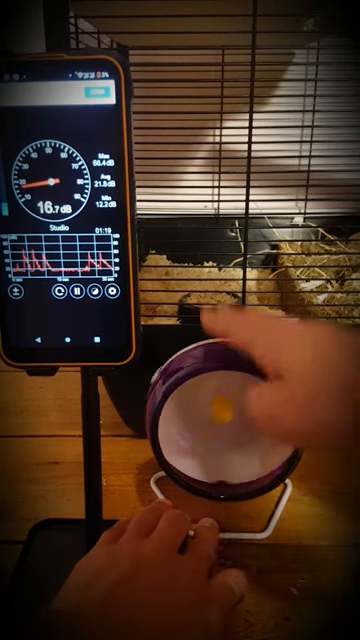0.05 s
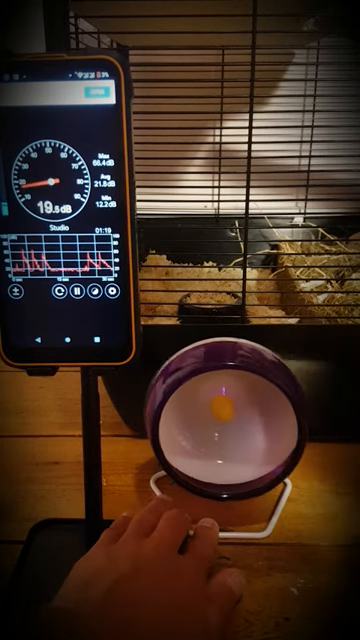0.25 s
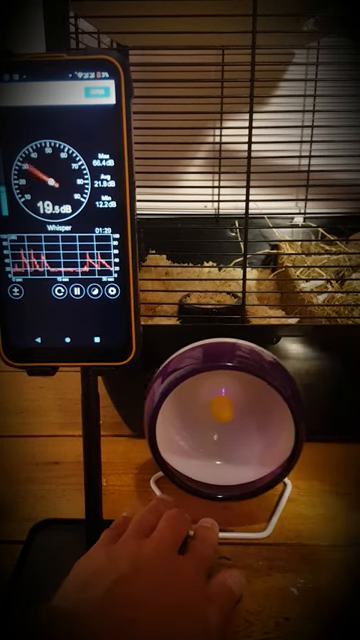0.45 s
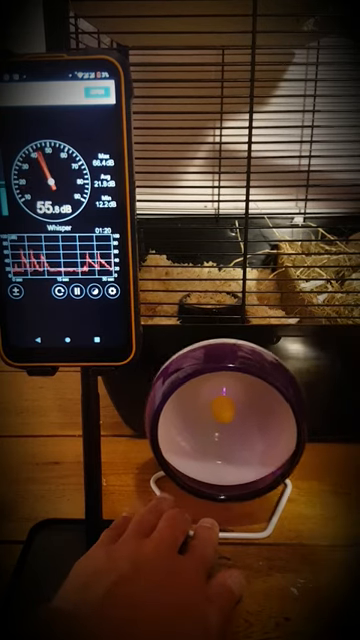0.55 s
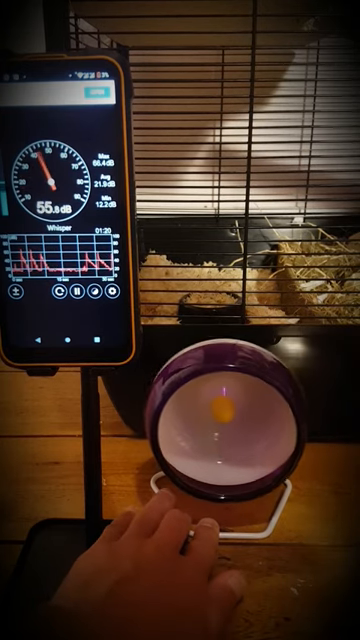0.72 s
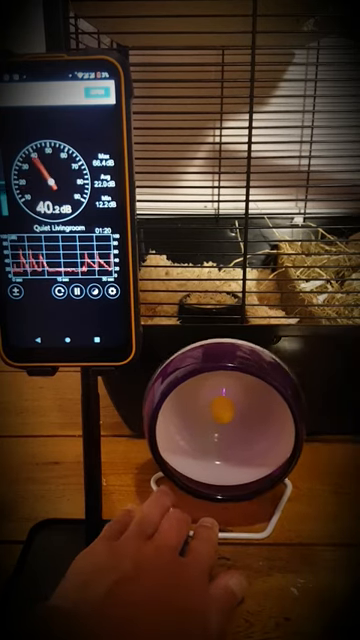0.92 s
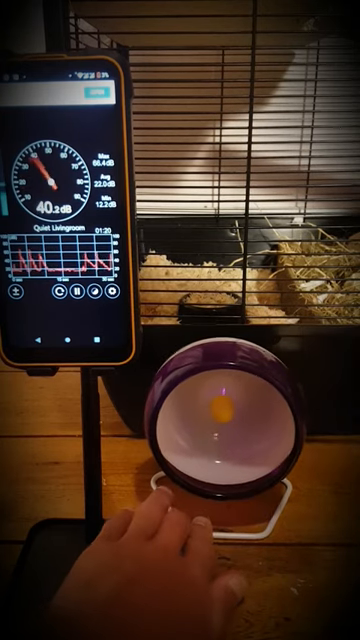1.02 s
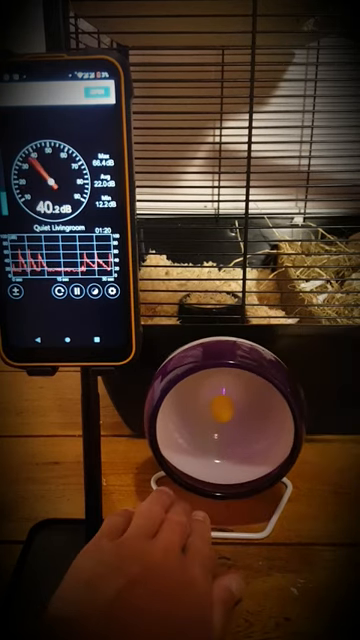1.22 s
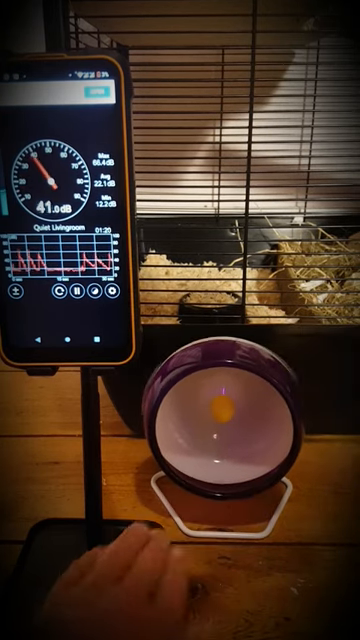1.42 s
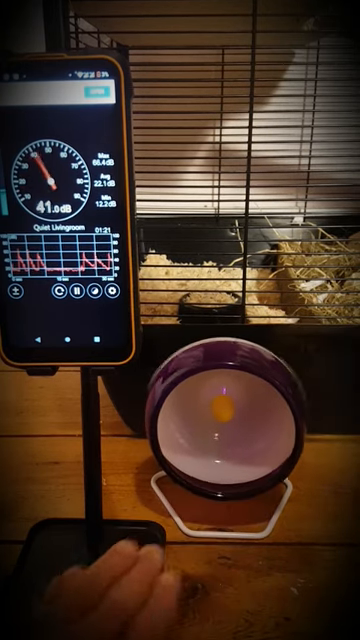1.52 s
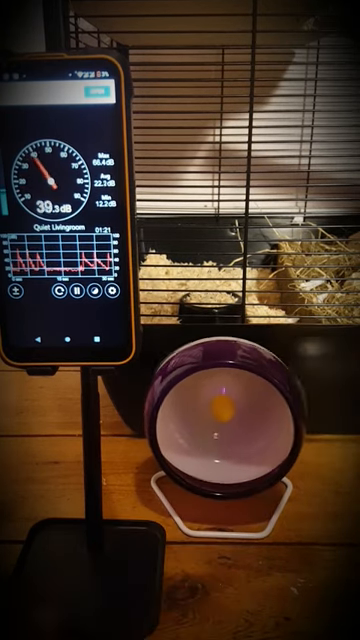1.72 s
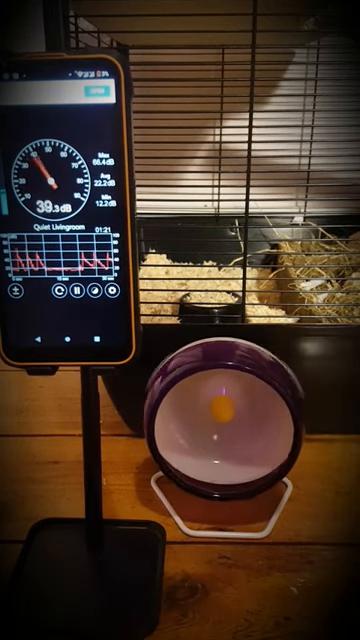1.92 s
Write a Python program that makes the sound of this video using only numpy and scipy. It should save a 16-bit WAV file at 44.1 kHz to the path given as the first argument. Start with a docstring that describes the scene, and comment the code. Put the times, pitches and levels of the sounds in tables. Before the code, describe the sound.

Plastic hamster wheel spinning with a low rattling whir after a finger flick and a knock.

```python
"""A fingertip scuffs and flicks a plastic hamster wheel on a wooden table, close up in a small, quiet room.
The stand shudders and the wheel knocks and chatters on its axle, then spins freely: the rolling bearing
drums on the hollow bowl with a low whir and a light rattle, dotted with clacks and off-centre bumps.
A soft hiss, like a sleeve brushing, comes in at the end."""
import sys
import numpy as np
from scipy import signal
from scipy.fft import rfft, irfft
from scipy.io import wavfile
from scipy.ndimage import uniform_filter1d

SR = 44100
rng = np.random.default_rng(int(sys.argv[2]) if len(sys.argv) > 2 else 0)


def output_pcm(signal):
    """Save a mono or channel-first signal as 16-bit PCM at the path in sys.argv[1].

    Samples are clipped to [-1, 1] before scaling.
    """
    pcm = np.clip(np.atleast_2d(signal).T, -1, 1) * 32767
    wavfile.write(sys.argv[1], SR, np.round(pcm).astype(np.int16))


N = 85995
T = np.arange(N) / SR
FREQ = np.arange(N + 1) * SR / (2 * N)
SIDES = np.array([[1], [-1]])  # left, right

# colour of the room tone (f/Hz, level/dB)
AIR_EQ = [(20, 4), (55, 4.5), (100, 2), (165, 6.5), (300, 2), (500, -10.5), (1200, -12.5), (3000, -18),
          (6000, -22.5), (10000, -26.5), (14500, -24.5)]

# finger touches on the rim (t/s, scuff level/dB, ring level/dB, attack/s)
RIM_TOUCHES = [(0.132, -66.5, -59, 0.0067), (0.172, -40.5, -42, 0.0028), (.190, -43.5, -35, 0.0023),
               (0.2104, -54.5, -32.5, 0.0058), (0.375, -49, -38, 0.0018)]
# colour of the scuff (f/Hz, level/dB)
SCUFF_EQ = [(300, -28), (900, -27), (1450, 10.5), (2050, 8), (2600, -4.5), (3600, 3), (4300, -2),
            (5000, -8), (6500, -15), (9000, -19), (14500, -18)]
# resonances of the rim under the finger (f/Hz, width/Hz, level/dB)
RIM_MODES = [(306, 116, -1.5), (596, 92, -9.5), (802, 41, -6), (960, 65, 0.5), (1220, 40, -5)]

# envelope of the stand's shudder (t/s, level/dB)
SHUDDER_ENVELOPE = [(.12, -75.5), (.17, -51), (.225, -56), (.255, -34), (.30, -37), (.335, -50),
                    (.49, -46.5), (.53, -55), (.565, -67), (.72, -63), (1.0, -72.5)]

# envelopes of the three spin layers (t/s, whir level/dB, rattle level/dB, grit level/dB)
SPIN_ENVELOPES = [(0.33, -38.5, -42, -54), (0.37, -49, -42, -56.5), (0.414, -39.5, -51.5, -59.5),
                  (0.572, -48.5, -44, -58.5), (0.614, -42.5, -47.5, -56.5), (0.772, -48.5, -47, -62.5),
                  (0.798, -47.5, -45, -55.5), (0.888, -42, -47, -60.5), (0.978, -54, -49, -66),
                  (1.02, -39.5, -49.5, -61), (1.154, -45.5, -50.5, -64), (1.276, -39.5, -50, -66.5),
                  (1.312, -43, -49, -63), (1.574, -43.5, -51, -67), (1.894, -45, -54.5, -64.5),
                  (1.95, -52, -56.5, -76)]
# low resonances of the bowl (f/Hz, width/Hz, level/dB)
WHIR_MODES = [(163.7, 52, -11.5), (203, 23, -10), (258.3, 37.5, 1.5), (285.6, 25, 0), (334.5, 24.8, 0),
              (369.7, 23.6, -1), (491.8, 40, -9), (550.6, 25, -11)]
# colour of the rumble passed to the table top (f/Hz, level/dB)
TABLE_EQ = [(30, -25), (55, -8), (80, -17), (110, -5), (160, -4.5), (210, -8), (260, -0.5), (420, -14.5),
            (700, -39), (2000, -80)]
# midrange resonances of the bowl (f/Hz, width/Hz, level/dB)
RATTLE_MODES = [(487, 88, -15), (634, 118, -9.5), (773, 60, -3), (892, 76, -2), (960, 68, -1),
                (1034, 86.4, -3.5), (1196, 136, -7.5), (1493, 44, -15.5)]
# colour of the bearing grit (f/Hz, level/dB)
GRIT_EQ = [(900, -25), (1700, 9.5), (2300, 1.5), (2700, 2.5), (4100, -3.5), (4900, -11), (7500, -18.5),
           (10000, -22), (14500, -23.5)]
# high resonances of the thin shell (f/Hz, width/Hz, level/dB)
SHELL_MODES = [(1700, 110, -2.5), (2018, 51, 10), (2280, 49, 1), (2670, 21, 2.5), (3170, 40, -4.5),
               (3866, 147, -6), (4290, 60, -10.5)]

# the knock and its rebounds (t/s, level/dB, contact time/ms)
AXLE_HITS = [(0.2417, 5.5, 0.46), (.2518, -17.5, 0.93), (0.264, -22, 0.89), (.2722, -9.5, .5),
             (0.2832, -10.5, 0.14), (.2950, -26, .8), (.3075, -10.5, 1)]
# modes of the knocked wheel and stand (f/Hz, level/dB, t60/s)
BODY_MODES = [(106, -19, 0.47), (129.1, -20, 0.52), (154.5, -26, 0.26), (200.4, -14.5, 0.182),
              (232, -20, 0.37), (297.7, -16, 0.18), (363.2, -9, 0.17), (407, -5.5, 0.133),
              (478.5, -11, 0.18), (576.3, -5, 0.13), (684.8, -1.5, 0.15), (807, -5, 0.052),
              (999, -5, 0.034), (1117, -5, 0.043), (1295, 1.5, 0.019), (1566, -7, 0.049),
              (2062, -13.5, 0.06), (2295, -25, 0.1)]

# clacks of play in the bearing (t/s, level/dB, tick offset/dB)
BEARING_CLACKS = [(0.344, -41, -32), (0.377, -34, -24), (0.401, -37.5, -46), (0.421, -31.5, -28),
                  (0.451, -32, -32), (0.488, -33.5, -24), (0.517, -33.5, -23), (0.62, -36, -21),
                  (0.704, -40, -30), (0.793, -38, -25), (1.0, -42, -13), (1.208, -37, -26),
                  (1.238, -39.5, -31), (1.265, -29, -30.5), (1.41, -39, -25)]
# bumps of the off-centre wheel on its axle (t/s, level/dB)
AXLE_BUMPS = [(0.455, -34), (0.524, -31), (0.586, -34.5), (0.617, -31), (0.781, -34.5), (0.835, -31.5),
              (0.997, -35.5), (1.091, -34), (1.143, -30.5), (1.189, -28.5), (1.213, -25.5), (1.271, -30),
              (1.486, -30), (1.506, -37), (1.631, -41), (1.706, -29.5), (1.819, -51), (1.868, -30)]

# colour of the sleeve's hiss (f/Hz, level/dB)
SLEEVE_EQ = [(800, -1), (2000, 5), (4000, 5), (6000, -0.5), (9000, 3.5), (13000, 2), (15000, -6)]

# balance of the direct sound (f/Hz, left minus right/dB)
DIRECT_PAN = [(100, 2.5), (200, -0.5), (370, -0.5), (680, 3), (1250, -4), (2300, -3), (4200, 0.5),
              (7000, 16), (14000, -5)]
# colour of the room's reflections (f/Hz, level/dB)
REVERB_EQ = [(80, -20), (180, -24), (350, -8.5), (700, -11), (1400, -5.5), (3000, -5), (8000, 0)]


def amp(db):
    """Decibels to gain."""
    return 10 ** (np.asarray(db) / 20)


def unit(x):
    """Scale to rms 1."""
    return x / np.sqrt(np.mean(x ** 2))


def pan(db):
    """Left and right gains that lie db apart; negative leans right."""
    return amp(SIDES * db / 2)


def by_hz(points):
    """Spread an EQ curve (f/Hz, level/dB) over the frequency axis."""
    hz, db = np.array(points).T
    return np.interp(np.log(FREQ + 1), np.log(hz), db)


def shape(x, response):
    """Filter by a frequency response."""
    return irfft(rfft(x, 2 * N) * response)[..., :N]


def colour(x, points):
    """Causal EQ through (f/Hz, level/dB) points; rms 1."""
    cepstrum = irfft(np.log(amp(by_hz(points))))
    return unit(shape(x, np.exp(rfft(2 * cepstrum[:N], 2 * N))))


def resonate(x, modes):
    """Parallel resonators of alternating polarity."""
    bands = ((-1) ** k * amp(db) * 1j * FREQ * width / (f * f - FREQ ** 2 + 1j * FREQ * width)
             for k, (f, width, db) in enumerate(modes))
    return shape(x, sum(bands))


def even(x, window=3500):
    """Leveller: keep the quick flutter, flatten swells longer than the window of samples."""
    return x / np.sqrt(uniform_filter1d(x * x, window) + 1e-18)


def envelope(rows, column=1):
    """Gain over time from one dB column of a timed table."""
    rows = np.array(rows)
    return amp(np.interp(T, rows[:, 0], rows[:, column]))


def swell(start, attack):
    """Rounded attack up to 1, then a decay."""
    age = np.maximum(T - start, 0) / attack
    return age * np.exp(1 - age)


def burst(start, decay):
    """Instant attack, exponential decay."""
    return (T >= start) * np.exp(-np.maximum(T - start, 0) / decay)


def room_tone(wide_above_hz=600):
    """A quiet bed of room noise, near mono in the bass."""
    mid, side = colour(rng.standard_normal((2, N)), AIR_EQ)
    return amp(-61) * (mid + SIDES * shape(side, FREQ / (FREQ + wide_above_hz)))


def finger(ring_lag_s=0.0019):
    """The fingertip catches the rim: a crisp scuff, and the rim rings hollow."""
    scuff = even(colour(rng.standard_normal(N), SCUFF_EQ), window=200)
    ring = even(resonate(rng.standard_normal(N), RIM_MODES), window=300)
    out = np.zeros(N)
    for t, scuff_db, ring_db, attack in RIM_TOUCHES:
        out += amp(scuff_db) * swell(t, attack) * scuff
        out += amp(ring_db) * swell(t, attack + ring_lag_s) * ring
    return out


def shudder(hum_hz=77):
    """The stand hums on the table top until the wheel settles."""
    return envelope(SHUDDER_ENVELOPE) * unit(np.sin(2 * np.pi * hum_hz * T))


def bearing_contacts(spread_db, per_s=520):
    """Dense tiny impacts of the rolling bearing, uneven in spacing and force."""
    count = int(per_s * N / SR)
    jitter, chance, polarity = rng.random((4000, 3))[:count].T
    onsets = ((np.arange(count) + jitter) / per_s * SR).astype(int) % N
    force = amp(-spread_db * np.log(np.maximum(chance, .02)))
    impacts = np.zeros(N)
    impacts[onsets] = np.sign(polarity - .5) * force
    return impacts


def roll_hz(start_hz=375.4, sag_hz_per_s=45):
    """The rolling frequency sinks as the wheel slows."""
    return start_hz - sag_hz_per_s * T


def whir(drive, lift_db=4, lift_width_hz=27):
    """The bowl's low modes ring, lifted near the rolling frequency, over a rumble from the table top."""
    bowl = np.zeros(N)
    for f, width, db in WHIR_MODES:
        band = [(f, width, 0)]
        ring = even(resonate(resonate(drive, band), band), window=9000)  # two passes for steep skirts
        nearness = np.exp(-((f - roll_hz()) / lift_width_hz) ** 2)
        bowl += ring * amp(db + lift_db * nearness)
    return even(bowl) + amp(-17.5) * even(colour(drive, TABLE_EQ))


def spin(start_s=0.16, fade_in_s=0.11):
    """Bearing contacts set the bowl whirring and rattling; fine grit rings the thin shell."""
    drive = bearing_contacts(spread_db=3.5)
    fine = drive + bearing_contacts(spread_db=4)
    shell = amp(-4) * unit(resonate(fine, SHELL_MODES))
    low = amp(-1) * envelope(SPIN_ENVELOPES, column=1) * whir(drive)
    rattle = amp(-2) * envelope(SPIN_ENVELOPES, column=2) * even(resonate(drive, RATTLE_MODES))
    grit = amp(-1) * envelope(SPIN_ENVELOPES, column=3) * even(colour(fine, GRIT_EQ) + shell)
    return (low + rattle + grit) * np.clip((T - start_s) / fade_in_s, 0, 1)


def knock(crack_decay_s=.012):
    """The released wheel strikes its axle and rebounds about a hundred times a second."""
    body = sum((-1) ** k * amp(db) * amp(-60 * T / t60) * np.sin(2 * np.pi * f * T)
               for k, (f, db, t60) in enumerate(BODY_MODES))
    # the longer the contact, the duller the hit
    hit_spectrum = sum(amp(db) * np.exp(-2j * np.pi * FREQ * t) / (1 + 1j * FREQ * ms / 1000) ** 2
                       for t, db, ms in AXLE_HITS)
    crack_level = sum(amp(db) * burst(t, crack_decay_s) for t, db, _ in AXLE_HITS)
    crack = crack_level * colour(rng.standard_normal(N), GRIT_EQ)
    return amp(-21.5) * shape(body, hit_spectrum) + amp(-47) * crack


def clacks(attack_s=0.0037, rub_hz=1040, rub_width_hz=570):
    """Slack in the bearing: short rubbing clacks, each topped with a faint gritty tick."""
    tick = amp(3) * even(colour(rng.standard_normal(N), GRIT_EQ), window=300)
    bowl = resonate(rng.standard_normal(N), RATTLE_MODES)
    rub = amp(-7.5) * even(resonate(bowl, [(rub_hz, rub_width_hz, 0)]), window=500)
    return sum(amp(db) * swell(t, attack_s) * (rub + amp(tick_db) * tick)
               for t, db, tick_db in BEARING_CLACKS)


def bumps(attack_s=0.0046):
    """The off-centre wheel bumps its axle: short throbs pitched at the rolling frequency."""
    throb = np.sin(2 * np.pi * (np.cumsum(roll_hz()) / SR + rng.random()))
    return amp(-6) * throb * sum(amp(db) * swell(t, attack_s) for t, db in AXLE_BUMPS)


def sleeve(start_s=1.74, fade_in_s=0.069, fade_db_per_s=18):
    """A sleeve brushes as the arm draws away: soft, bright hiss on the right."""
    age = T - start_s
    level = np.clip(age / fade_in_s, 0, 1) * amp(-60.5 - fade_db_per_s * age)
    return level * colour(rng.standard_normal((2, N)), SLEEVE_EQ) * pan(-5)


def room(x, t60_s=0.2, predelay_s=.002, mid_db=-5, phase_rad=1, phase_corner_hz=1240):
    """Pan the direct sound by frequency; cage and walls add a short tail, widest in the treble."""
    phase_gap = phase_rad * FREQ ** 2 / (FREQ ** 2 + phase_corner_hz ** 2)  # left lags right
    direct = pan(by_hz(DIRECT_PAN)) * np.exp(-.5j * SIDES * phase_gap)
    tail = rng.standard_normal((2, N)) * amp(-60 * T / t60_s) * (T > predelay_s)
    tail_gain = amp(by_hz(REVERB_EQ))
    mid, side = rfft(unit(tail) / np.sqrt(N), 2 * N) * tail_gain
    build_up = np.hypot(1, amp(mid_db) * tail_gain)
    return shape(x, (direct + amp(mid_db) * mid + SIDES * side) / build_up)


def scene():
    """Flick, knock and free spin in the room, with the spin a little to the right."""
    rolling = (spin() + clacks() + bumps()) * pan(-2)
    wheel = finger() + shudder() + knock() + rolling
    return room(wheel) + sleeve() + room_tone()


def record(dry, low_cut_hz=45, high_cut_hz=14700):
    """The microphone drops the deep bass and cuts the top."""
    low_cut = signal.butter(2, low_cut_hz, "high", fs=SR, output="sos")
    high_cut = signal.ellip(10, .2, 70, high_cut_hz, fs=SR, output="sos")
    return signal.sosfilt(high_cut, signal.sosfilt(low_cut, dry))


dry = scene()
out = record(dry)
output_pcm(out)
```